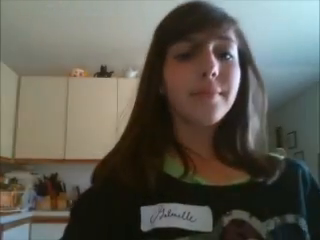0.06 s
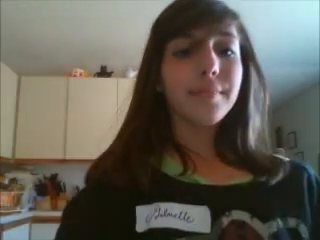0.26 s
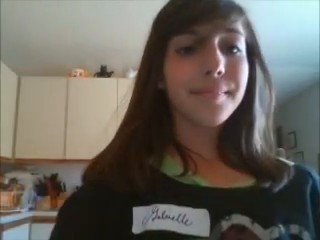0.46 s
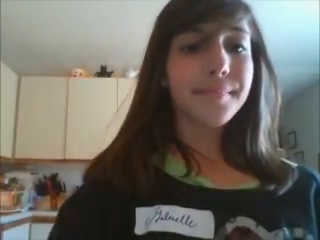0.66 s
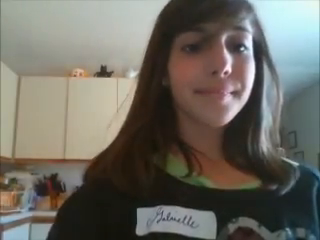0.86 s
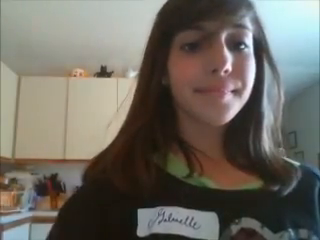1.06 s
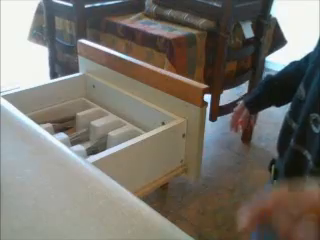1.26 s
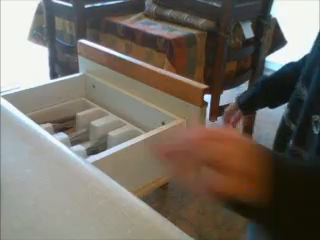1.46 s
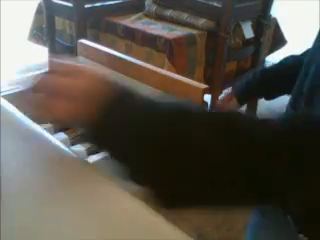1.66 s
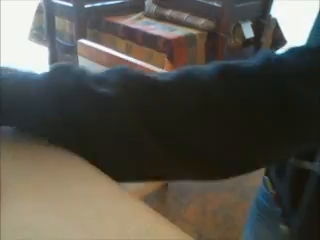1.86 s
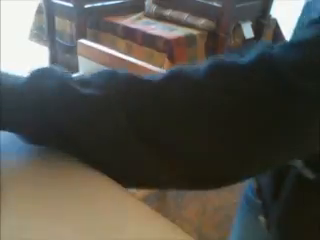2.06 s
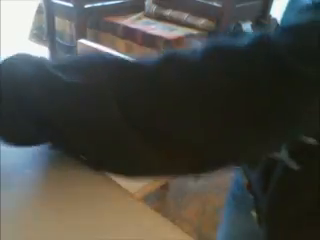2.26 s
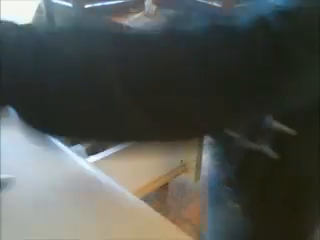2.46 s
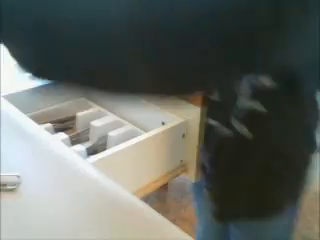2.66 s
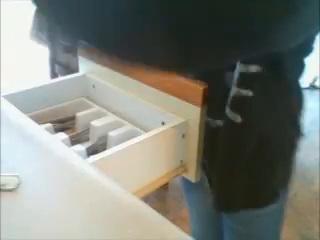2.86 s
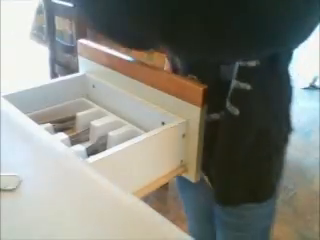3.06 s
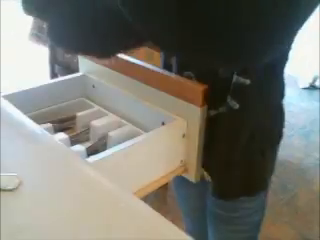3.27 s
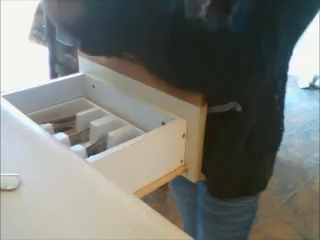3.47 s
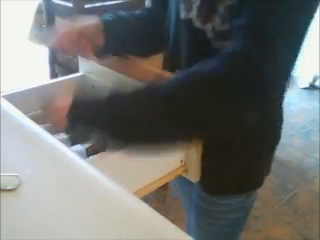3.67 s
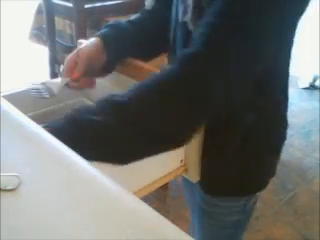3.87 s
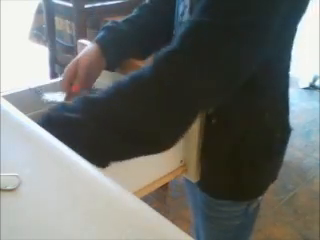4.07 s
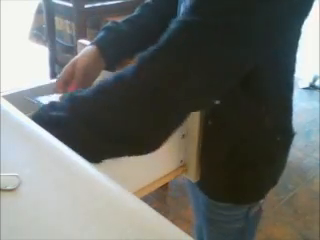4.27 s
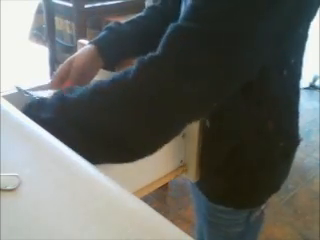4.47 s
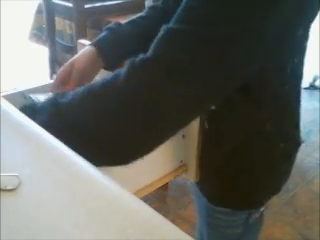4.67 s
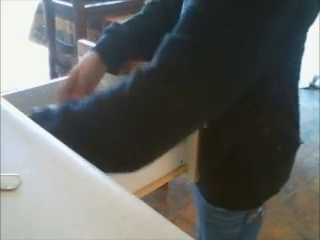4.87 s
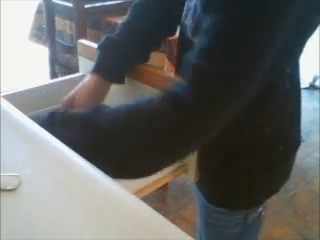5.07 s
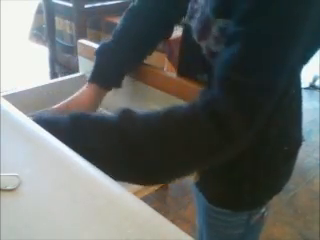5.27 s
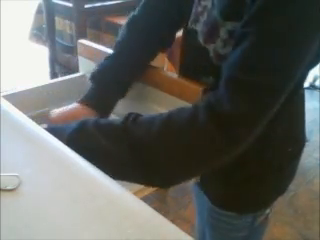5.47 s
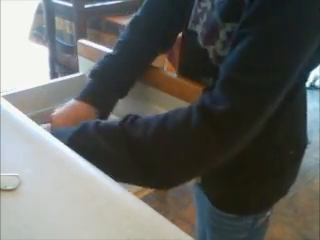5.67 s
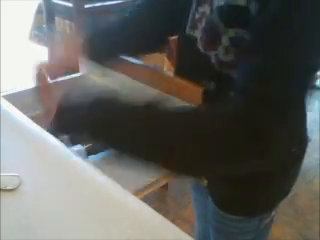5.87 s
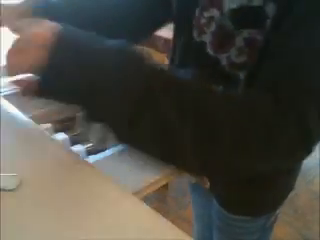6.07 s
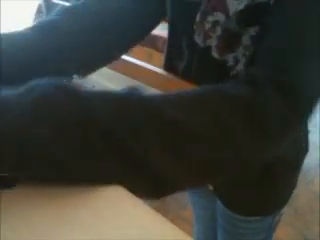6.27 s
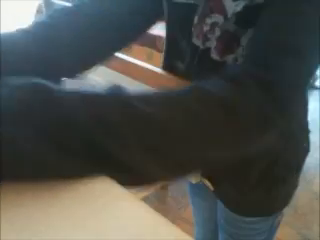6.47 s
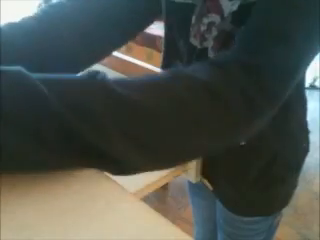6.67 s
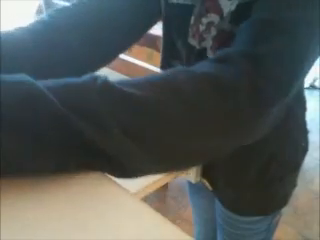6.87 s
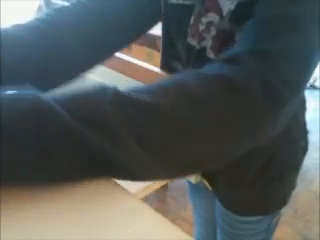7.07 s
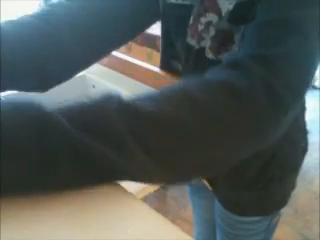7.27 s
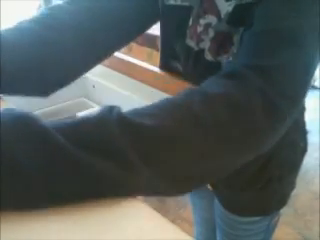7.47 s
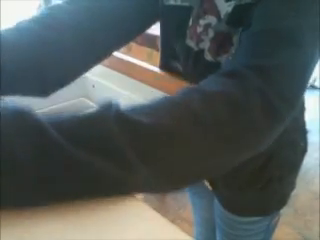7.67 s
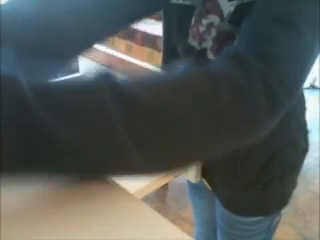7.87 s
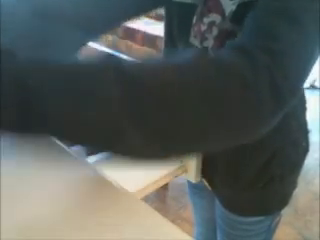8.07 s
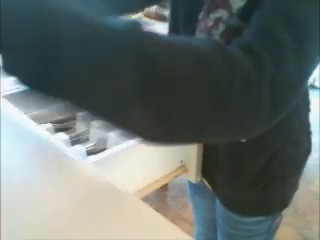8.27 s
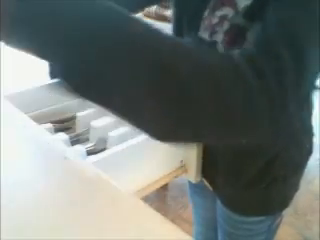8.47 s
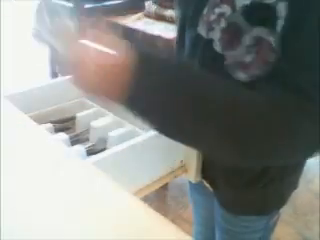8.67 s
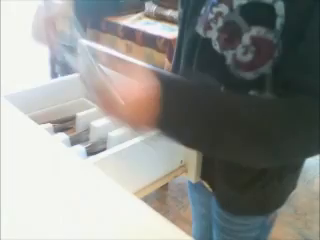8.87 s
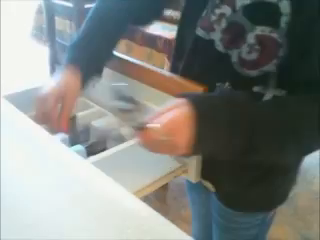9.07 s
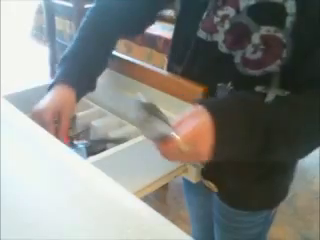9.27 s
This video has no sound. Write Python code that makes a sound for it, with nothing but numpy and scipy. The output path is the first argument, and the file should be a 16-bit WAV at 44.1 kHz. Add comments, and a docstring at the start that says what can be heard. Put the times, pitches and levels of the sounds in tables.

```python
"""A mono microphone on a kitchen counter is bumped and turned over steady hiss, rumble and a 60 Hz hum.
Steel cutlery is then lifted in a crash and sorted into the plastic tray of an open wooden drawer, ending in dull knocks.
Blows and slides are noise-like contact forces passed through damped steel modes and the drawer's response.
The kitchen echoes this clatter; freely ringing pieces are decaying sines, and one late scrape is a rough rising note.
The input clips at full scale and a low-pass cuts the top."""
import sys
import numpy as np
from scipy import signal
from scipy.fft import rfft, irfft, next_fast_len
from scipy.io import wavfile

SR = 44100
rng = np.random.default_rng(int(sys.argv[2]) if len(sys.argv) > 2 else 0)


def store_wav(level_fs):
    """Save 16-bit WAV to argv[1]."""
    pcm = np.round(np.clip(np.atleast_2d(level_fs), -1, 1) * 32767)
    wavfile.write(sys.argv[1], SR, pcm.T.astype(np.int16))


N = 411453
SIZE = 32768  # samples in one sound
AGE_S = np.arange(SIZE) / SR
HZ = np.maximum(np.arange(SIZE // 2 + 1) * SR / SIZE, 1)

# ranges of thud, knock, clack and chink: (low [Hz], high [Hz])
RANGES = [(110, 700), (700, 1700), (1700, 4500), (4500, 15700)]


def undb(db):
    """Decibels to gain."""
    return 10 ** (np.asarray(db) / 20)


def unit(x):
    """Scale to rms 1."""
    return x / np.sqrt(np.mean(np.abs(x) ** 2))


def fade(t60_s):
    """Exponential decay, 60 dB down after t60."""
    return np.exp(-np.log(1000) * AGE_S / max(t60_s, 1e-3))


def along(points, hz):
    """Read (Hz, value) points on a log-frequency axis."""
    point_hz, value = np.transpose(points)
    return np.interp(np.log(hz), np.log(point_hz), value)


def add(track, start_s, sound):
    """Mix a sound into the track from start_s."""
    start = max(int(start_s * SR), 0)
    part = sound[:max(N - start, 0)]
    track[start:start + len(part)] += part


def causal(gain):
    """Minimum-phase response with this gain: nothing sounds before the blow."""
    cepstrum = irfft(np.log(gain + 1e-6))
    cepstrum[1:SIZE // 2] *= 2
    cepstrum[SIZE // 2 + 1:] = 0
    return np.exp(rfft(cepstrum))


def resonance(hz, width_hz):
    """Response of one resonance, gain 1 at its centre."""
    return 1 / (1 + 1j * (HZ / hz - hz / HZ) * hz / width_hz)


def band(low_hz, high_hz, order=5):
    """Gain of a band-pass; neighbouring bands add up in power."""
    low_cut = 1 + (low_hz / HZ) ** (2 * order)
    high_cut = 1 + (HZ / high_hz) ** (2 * order)
    return 1 / np.sqrt(low_cut * high_cut)


def shaped_noise(gain):
    """White noise filtered by a gain over HZ."""
    return irfft(rfft(rng.standard_normal(SIZE)) * gain)


def shares(level_db, touch, bright_db=0):
    """Level of each range for a contact of this strength and kind; brightness tilts from thud to chink."""
    # how a contact shares its energy, by kind: (drawer thud [dB], tray knock [dB], handle clack [dB],
    # steel chink [dB]). drawer: piece on its floor; tray: piece drops in and jogs others; wall: dull knock
    # on tray wall; handle: handle on handle; bunch: loose pieces; stack: steel on the pile in the tray;
    # steel: bowls and blades meet; tip: only a tip or tine touches
    touches = dict( drawer=(-1, -2, -14, -12.5), tray=(-10, 0.5, -7, -13.5), wall=(-11.5, 0.5, -13, -25),
               handle=(-10.5, -11, -0.5, -11.5), bunch=(-10.5, -2.5, -2, -6.5), stack=(-3.5, -0.5, -8, -2),
               steel=(-11.5, -4, -1.5, 0), tip=(-15.5, -20.5, -11, 0.5))
    tilt_db = bright_db * np.linspace(-.5, .5, len(RANGES))
    return level_db + np.array(touches[touch]) + tilt_db


def contacts(rate_hz, spread_db, tick_t60_s):
    """A dense run of tiny collisions of uneven size, each a very short crackle; rms 1."""
    sizes = undb(spread_db * np.minimum(rng.exponential(size=SIZE), 2.6))
    pulses = (rng.random(SIZE) < rate_hz / SR) * sizes ** 2
    # power falls in one sample as far as amplitude does in two
    power = signal.lfilter([1], [1, -fade(tick_t60_s)[2]], pulses + 1e-18)
    return unit(np.sqrt(power) * rng.standard_normal(SIZE))


def steel(t60_s, ring_db, spread_db=3, place_db=3, count=56):
    """One piece lying in the heap: a dry tick plus many short modes, damped by its neighbours."""
    mode_hz = rng.uniform(4500, 15600, count)
    mode_t60_s = t60_s * np.exp(0.22 * rng.standard_normal(count))
    width_hz = np.log(1000) / np.pi / mode_t60_s
    gain = undb(spread_db * rng.standard_normal(count)) * rng.choice([-1, 1], count) / np.sqrt(width_hz)
    modes = sum(g * resonance(f, w) for f, w, g in zip(mode_hz, width_hz, gain))
    # where it lies in the tray decides which of the drawer's resonances it reaches
    coupling = np.column_stack([np.geomspace(200, 7000, count), place_db * rng.standard_normal(count)])
    return (1 + undb(ring_db) * unit(modes)) * causal(undb(along(coupling, HZ)))


def drawer():
    """Response of drawer, tray and counter in each range: resonances on a broad contact response."""
    # broad response of a contact: (frequency [Hz], level [dB])
    broad = [(100, 0), (280, -5), (450, -5), (1200, 4.5), (1500, 0), (3000, 2), (4000, -5.5), (5200, -11.5),
             (10000, -9), (15500, -16.5)]
    # resonances of drawer, tray and counter: (frequency [Hz], width [Hz], level over broad response [dB])
    resonances = [(244.3, 30, -3.5), (427, 170, 9.5), (747, 60, 1.5), (1060, 84, 3.5), (1145, 127, 3),
                  (1834, 70, -2), (2020, 115, 2), (2243, 86, 4.5), (2660, 92, 2.5), (3283, 35, 1.5),
                  (5230, 48, -2.5)]
    peaks_db = sum(db * np.abs(resonance(hz, width_hz)) ** 2 for hz, width_hz, db in resonances)
    gain = undb(along(broad, HZ) + peaks_db)
    return [causal(gain * band(low_hz, high_hz)) for low_hz, high_hz in RANGES]


def resound(force, envelope, levels_db, body, piece):
    """Pass a contact force through a piece and the drawer; each range takes its share of the energy."""
    spectrum = rfft(force * envelope) * piece
    parts = (undb(db) * unit(spectrum * response) for db, response in zip(levels_db, body))
    return irfft(sum(parts)) * np.sqrt(np.sum(envelope ** 2))


def blows(body, heap, crack_db=-2.5, crack_t60_s=0.031):
    """Each blow starts with a hard crack and chatters to rest."""
    # single blows: (time [s], envelope t60 [s], level before shares [dB], kind of contact)
    blow_list = [(1.828, 0.12, -35.5, "handle"), (1.858, 0.16, -26, "steel"), (1.968, 0.12, -22.5, "steel"),
                 (2.027, 0.1, -8, "handle"), (2.136, 0.046, -6.5, "handle"), (2.319, .07, -12.5, "bunch"),
                 (2.461, 0.016, -3.5, "tray"), (2.667, 0.072, -29.5, "tray"), (2.987, 0.15, -44, "bunch"),
                 (3.148, .06, -41, "tip"), (3.157, 0.028, -27, "tip"), (3.267, 0.029, -32.5, "tip"),
                 (3.294, .025, -28, "tip"), (3.922, 0.07, -39.5, "tip"), (4.239, 0.08, -35.5, "wall"),
                 (4.296, 0.35, -30.5, "stack"), (4.315, .045, -16.5, "wall"), (4.68, 0.25, -29.5, "drawer"),
                 (4.754, 0.029, -16.5, "drawer"), (4.789, .1, -23.5, "tip"), (5.001, 0.11, -21.5, "tray"),
                 (5.084, 0.1, -18, "drawer"), (5.232, 0.15, -33, "stack"), (5.4, 0.038, -29.5, "drawer"),
                 (5.533, 0.063, -25, "drawer"), (6.2, 0.12, -23, "bunch"), (6.422, 0.019, -12.5, "handle"),
                 (6.781, 0.068, -25.5, "stack"), (6.821, 0.085, -22.5, "tray"), (6.862, 0.072, -28, "tip"),
                 (6.952, 0.06, -31.5, "stack"), (7.047, 0.051, -31, "stack"), (7.144, 0.019, -14, "handle"),
                 (7.238, 0.11, -24.5, "handle"), (7.291, 0.052, -14, "handle"),
                 (7.338, 0.076, -12.5, "handle"), (7.515, 0.095, -18, "bunch"), (7.563, 0.024, -9, "bunch"),
                 (7.666, 0.05, -20.5, "bunch"), (7.821, 0.085, -17.5, "bunch"), (7.881, .06, -25, "steel"),
                 (7.926, 0.25, -20.5, "tip"), (8.025, 0.058, -29.5, "steel"), (8.11, 0.022, -26, "tip"),
                 (8.95, 0.088, -20, "drawer"), (9.042, 0.096, -19, "wall"), (9.304, 0.056, -27, "wall")]
    out = np.zeros(N)
    for time_s, t60_s, level_db, touch in blow_list:
        crack = undb(crack_db) * fade(crack_t60_s) * rng.standard_normal(SIZE)
        force = crack + contacts(rate_hz=1400, spread_db=2.5, tick_t60_s=0.0143)
        piece = heap[rng.integers(len(heap))]
        add(out, time_s, resound(force, fade(t60_s), shares(level_db, touch), body, piece))
    return out


def slides(body, heap):
    """Edges and tines catch on each other in a run of collisions that swells unevenly and dies away."""
    # pieces sliding and tumbling over each other: (peak time [s], rise [s], fall [s],
    # level before shares [dB], kind of contact, brightness [dB])
    slide_list = [(1.895, 0.026, 0.16, -30, "bunch", -7), (2.08, 0.12, 0.35, -19.5, "bunch", 0.5),
                  (2.25, 0.025, 0.039, -24, "steel", -5), (2.353, .035, 0.016, 2.5, "bunch", 6.5),
                  (2.39, 0.031, 0.13, -18, "bunch", 3.5), (2.53, 0.094, 0.055, -22, "bunch", 2),
                  (4.325, 0.053, 0.12, -34, "tray", -5), (4.519, 0.18, 0.22, -38.5, "stack", -1.5),
                  (4.789, 0.099, 0.13, -27.5, "stack", 3), (5.108, 0.037, 0.073, -28.5, "tray", 2),
                  (5.283, 0.074, 0.14, -37, "stack", -0.5), (5.57, .16, 0.2, -30, "stack", 1),
                  (6.22, 0.01, 0.092, -26, "tray", -6.5), (6.44, 0.18, 0.14, -22, "bunch", 1),
                  (6.686, 0.054, 0.051, -17.5, "bunch", 0.5), (6.85, .15, 0.26, -36, "stack", -3),
                  (7.15, .045, 0.048, -22, "tray", 10), (7.31, 0.19, .12, -26, "bunch", 6),
                  (7.42, 0.061, 0.16, -35, "bunch", -13.5), (7.565, 0.058, 0.078, -11.5, "tray", 5),
                  (7.959, 0.028, 0.12, -25.5, "bunch", -1.5), (8.061, .019, 0.041, -31, "tray", 0),
                  (8.301, 0.09, 0.15, -45.5, "tip", 0), (8.964, 0.009, 0.1, -29, "drawer", 7)]
    rise_bend, fall_bend = 1.3, 1.08  # above 1: starts and stops more suddenly than an exponential
    catch_hz, catch_db = 71.3, 1.43  # catch and slip: rate of random level points, their spread
    out = np.zeros(N)
    for peak_s, rise_s, fall_s, level_db, touch, bright_db in slide_list:
        t = AGE_S - 1.5 * rise_s
        rising = np.abs(t / rise_s) ** rise_bend
        falling = np.abs(t / fall_s) ** fall_bend
        envelope = 10 ** -np.where(t < 0, rising, falling)  # 20 dB in one rise or fall time
        swing = np.interp(AGE_S * catch_hz, np.arange(SIZE), rng.standard_normal(SIZE))
        force = undb(catch_db * swing) * contacts(rate_hz=1100, spread_db=2.5, tick_t60_s=0.016)
        piece = heap[rng.integers(len(heap))]
        levels_db = shares(level_db, touch, bright_db)
        add(out, peak_s + t[0], resound(force, envelope, levels_db, body, piece))
    return out


def rings(touched_t60_s=0.33):
    """A piece that lands free sings in its own modes until a touch damps it; the counter booms likewise."""
    # modes of pieces and counter: (frequency [Hz], relative level [dB], free t60 [s])
    things = dict(
        spoon=[(1072, -3, .7), (1733, -8, .55), (2277, -12, .55), (2654, -8, .5), (2729, -3, .45),
               (4683, -3, .55), (5421, -5, .25), (6611, -7, .42), (8683, -3, .35), (9249, -18, .35),
               (10480, -9, .5), (11840, -7, .5), (13320, -13, .38), (14710, -11, .45), (15560, -15, .45)],
        teaspoon=[(3343, 2, .45), (7946, -5, .65), (9636, -2, .5)],
        knife=[(1723, -16, .6), (4377, -15, .32), (6449, -19, .28), (8199, 0, .18), (12800, -16, .2)],
        fork=[(3300, -18, .35), (4996, -15, .35), (6519, -15, .35), (8430, -11, .3), (9160, -15, .2),
              (10490, -17, .3), (10642, 0, .15), (13540, -14, .18), (14255, -7, .15)],
        blade=[(4040, -2, .05), (4270, 0, .06), (5160, 0, .04)],
        counter=[(100, -5, .6), (232, 0, .4)])
    # strikes: (time [s], which, level [dB], time left free [s])
    strikes = [(2.041, "spoon", -22.5, 0.076), (2.151, "knife", -13.5, .09), (2.354, "spoon", -15, 0.23),
               (2.352, "counter", -19.5, .2), (2.464, "teaspoon", -27, .5), (6.781, "blade", -22, 0.0087),
               (7.529, "fork", -25.5, 0.11), (7.93, "fork", -19, .09)]
    out = np.zeros(N)
    for time_s, which, level_db, free_s in strikes:
        ring = np.zeros(SIZE)
        for hz, mode_db, t60_s in things[which]:
            sine = np.sin(2 * np.pi * hz * AGE_S) * rng.choice([-1, 1])
            ring += undb(mode_db) * fade(t60_s) * sine
        damping = np.exp(-np.log(1000) * np.maximum(AGE_S - free_s, 0) / touched_t60_s)
        add(out, time_s, undb(level_db) * ring * damping)
    return out


def scrape(middle_s=8.27, length_s=0.047, start_hz=3900, end_hz=4600, width_hz=500, level_db=-49):
    """An edge drawn lightly along another piece: a soft, rough note rising as the free length shortens."""
    t = AGE_S - 2 * length_s
    hz = np.interp(t, [-length_s, length_s], [start_hz, end_hz])
    grip = unit(shaped_noise(band(1, width_hz / 2, order=2)))
    note = grip * np.sin(2 * np.pi * np.cumsum(hz) / SR)
    out = np.zeros(N)
    add(out, middle_s - 2 * length_s, undb(level_db) * np.exp(-(t / length_s) ** 2) * note)
    return out


def kitchen(x, gap_s=0.0097, build_s=0.003):
    """Diffuse echo off cupboards and walls: decaying noise per octave, weak in the treble."""
    # decay of the echo: (frequency [Hz], t60 [s])
    room_t60 = [(150, 0.52), (1000, 0.365), (3000, 0.42), (12000, 0.5)]
    # level of the echo: (frequency [Hz], level against direct sound [dB])
    room_level = [(150, -7.5), (1200, -9), (3200, -9), (5500, -11), (14000, -18.5)]
    echo = np.zeros(SIZE)
    for low_hz in 80 * 2. ** np.arange(9):
        high_hz = 2 * low_hz
        t60_s = along(room_t60, np.sqrt(low_hz * high_hz))
        envelope = fade(t60_s) * np.clip((AGE_S - gap_s) / build_s, 0, 1)
        noise = shaped_noise(band(low_hz, high_hz))
        echo += noise * envelope / np.sqrt(np.sum(envelope ** 2))
    response = irfft(rfft(echo) * undb(along(room_level, HZ)))
    return signal.fftconvolve(x, response)[:N]


def handling():
    """What reaches the microphone by touch: resonant noise clicks and knocks, soft housing bumps."""
    # dry clicks beside the microphone and dull knocks through the counter:
    # (time [s], frequency [Hz], width of each of two resonances [Hz], excitation t60 [s], level [dB])
    clicks = [(0.951, 1900, 680, 0.02, -21.5), (0.95, 4500, 5000, 0.011, -33.5),
              (0.95, 670, 700, 0.049, -29.5), (1.131, 630, 604, 0.037, -23.5),
              (6.21, 106, 44.6, 0.92, -33.5), (6.66, 119, 60, 0.8, -35.5)]
    # bumps of the microphone's housing: (middle [s], frequency [Hz], length [s], peak level [dB])
    bumps = [(0.094, 42, 0.016, -13.5), (0.101, 124, 0.011, -27), (0.921, 51.5, 0.014, -31),
             (1.157, 170, 0.0065, -25.5), (2.75, 45, 0.016, -26.5), (4.86, 49.93, 0.012, -26)]
    out = np.zeros(N)
    for time_s, hz, width_hz, t60_s, level_db in clicks:
        burst = rng.standard_normal(SIZE) * fade(t60_s)
        click = irfft(rfft(burst) * resonance(hz, width_hz) ** 2)
        add(out, time_s, undb(level_db) * unit(click) * np.sqrt(np.mean(fade(t60_s) ** 2)))
    for middle_s, hz, length_s, level_db in bumps:
        t = AGE_S - np.pi * length_s
        bump = np.exp(-(t / length_s) ** 2) * np.cos(2 * np.pi * hz * t)
        add(out, middle_s - np.pi * length_s, undb(level_db) * bump)
    return out


def rumble():
    """Soft swells of low noise as the microphone is held or someone leans on the counter."""
    # swells of handling and movement: (middle [s], length [s], level [dB])
    swells = [(.16, 0.063, -38.5), (1.059, .1, -33.5), (3.838, 0.073, -39), (5.269, 0.15, -36),
              (8.744, 0.075, -37)]
    # colour of the rumble: (frequency [Hz], relative level per Hz [dB])
    colour = [(25, 1), (60, -5.5), (170, -17.5), (300, -27), (1000, -72)]
    out = np.zeros(N)
    for middle_s, length_s, level_db in swells:
        noise = unit(shaped_noise(undb(along(colour, HZ)) * (HZ > 10)))
        swell = np.exp(-(AGE_S / length_s - np.pi) ** 2)
        add(out, middle_s - np.pi * length_s, undb(level_db) * swell * noise)
    return out


def background(noise_db=-44, hum_hz=60.2, hum_db=-44.5, waver=0.143):
    """Steady filtered noise for rumble and hiss, with a low hum whose level wavers a little."""
    # kitchen background and microphone hiss: (frequency [Hz], relative level per Hz [dB])
    floor = [(20, 6), (45, -4.5), (90, -10), (200, -14), (450, -16), (900, -22), (1800, -24.5),
             (3500, -31.5), (5800, -34.5), (7000, -30), (8500, -37), (15500, -35.5)]
    size = next_fast_len(N, real=True)
    hz = np.maximum(np.arange(size // 2 + 1) * SR / size, 1)
    gain = undb(along(floor, hz)) * (hz > 10)
    noise = irfft(rfft(rng.standard_normal(size)) * gain, size)[:N]
    t = np.arange(N) / SR
    sway = np.interp(t, np.linspace(0, t[-1], 60), rng.standard_normal(60))
    hum = (1 + waver * sway) * np.sin(2 * np.pi * hum_hz * t)
    return undb(noise_db) * unit(noise) + undb(hum_db) * unit(hum)


def scene(count=16):
    """The clatter and its echo over the background, the same in both channels."""
    body = drawer()
    loose = [steel(t60_s=0.04, ring_db=-6) for _ in range(count)]
    sliding = [steel(t60_s=0.058, ring_db=-4.0) for _ in range(count)]
    clatter = blows(body, loose) + slides(body, sliding)
    mono = clatter + kitchen(clatter) + rings() + scrape() + handling() + rumble() + background()
    return np.array([mono, mono])


def record(dry, top_hz=15850):
    """The input clips at full scale, then a steep zero-phase low-pass cuts the top."""
    clipped = np.clip(dry, -1, 1)
    low_pass = signal.ellip(8, .1, 50, top_hz, fs=SR, output="sos")
    return signal.sosfiltfilt(low_pass, clipped)


dry = scene()
out = record(dry)
store_wav(out)
```